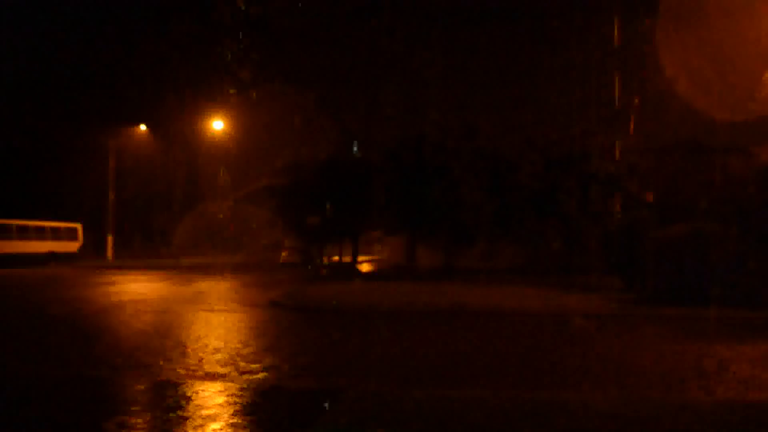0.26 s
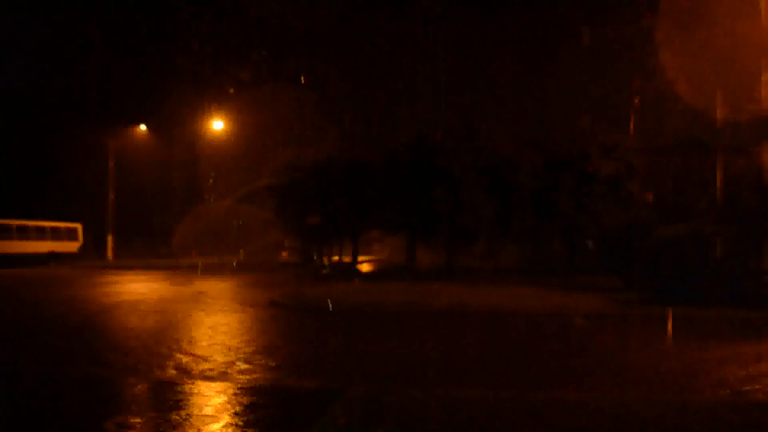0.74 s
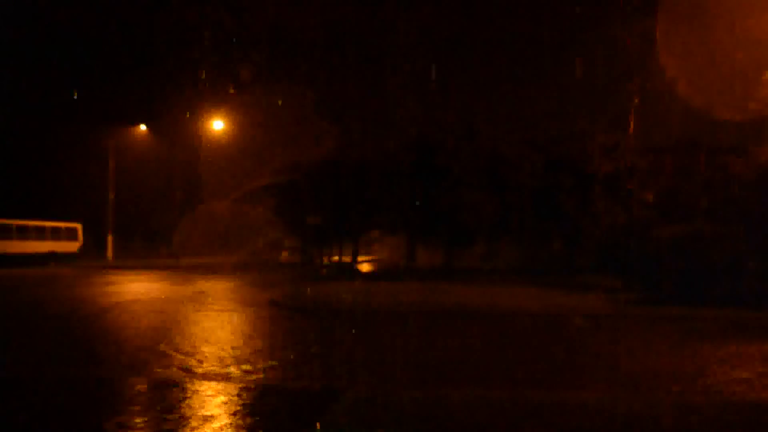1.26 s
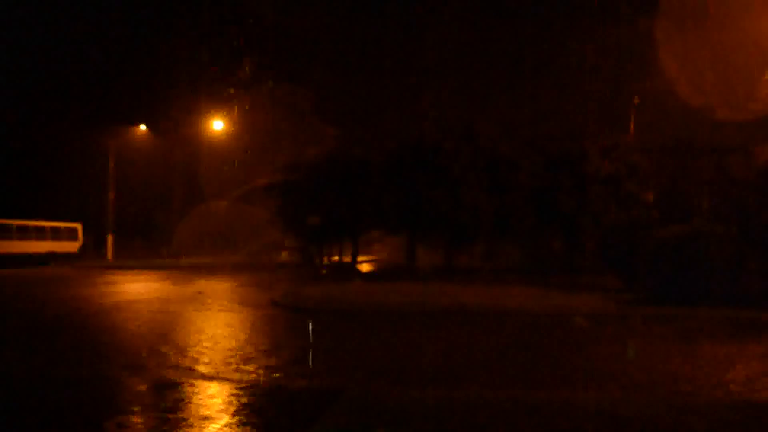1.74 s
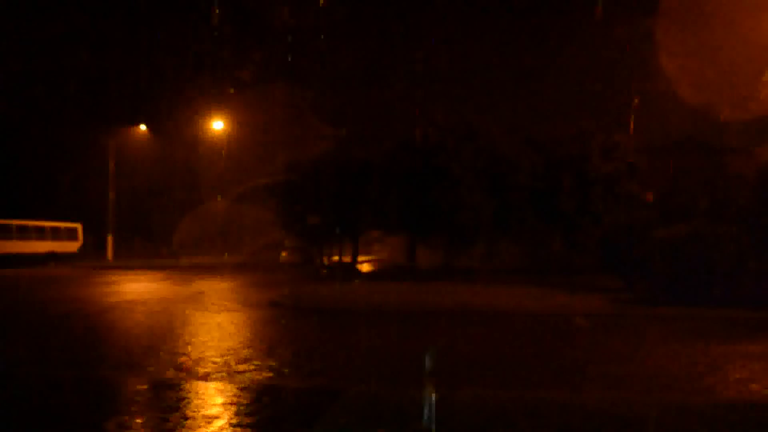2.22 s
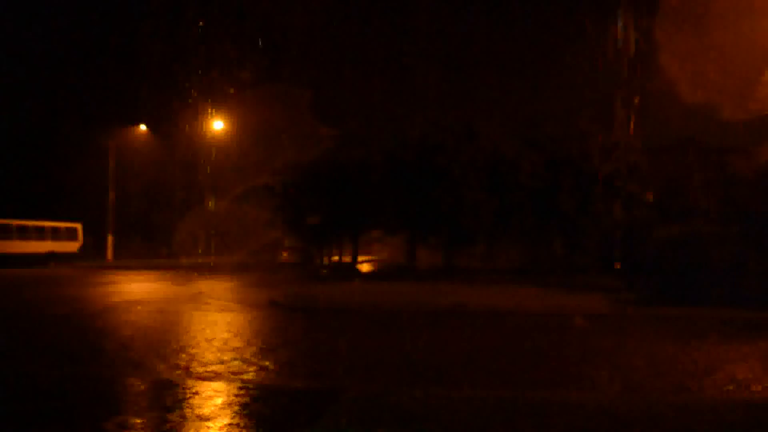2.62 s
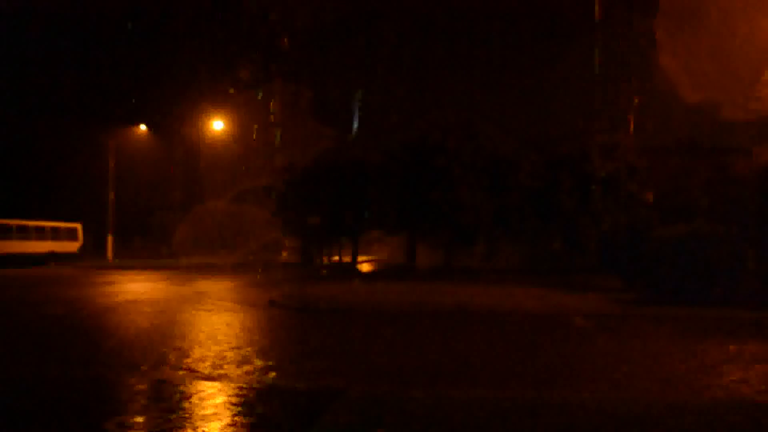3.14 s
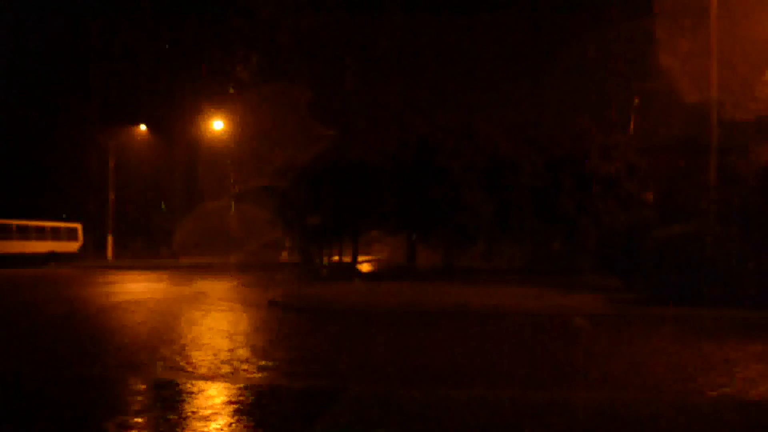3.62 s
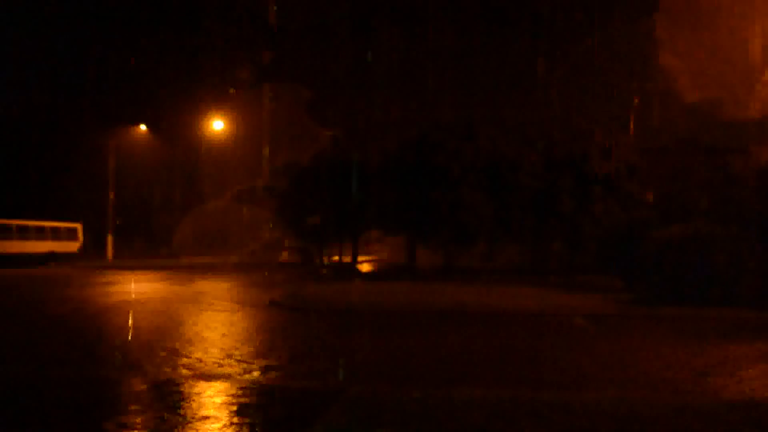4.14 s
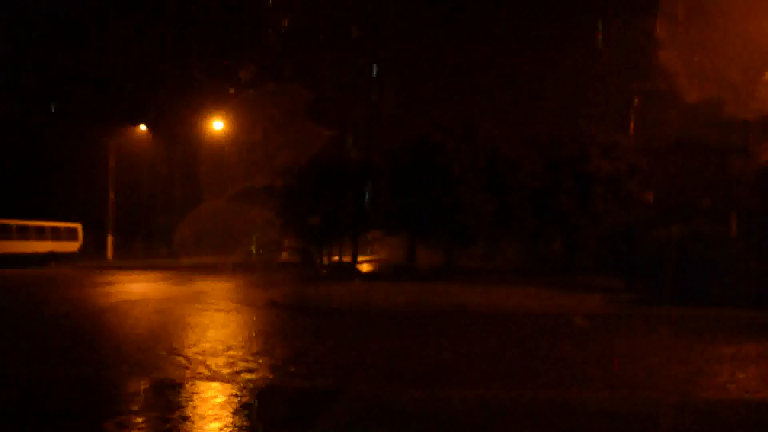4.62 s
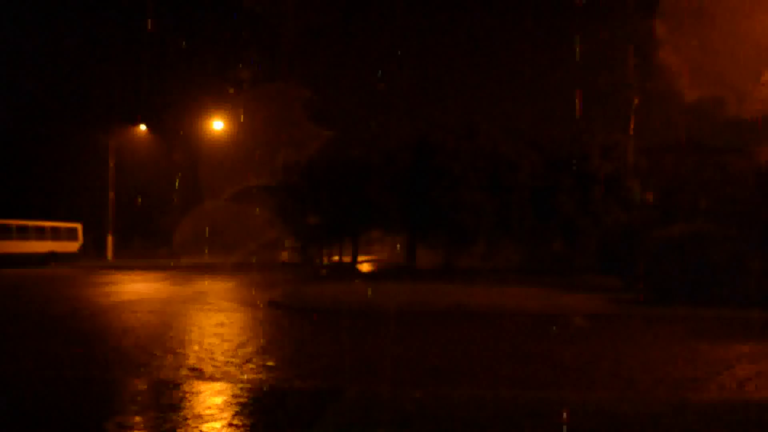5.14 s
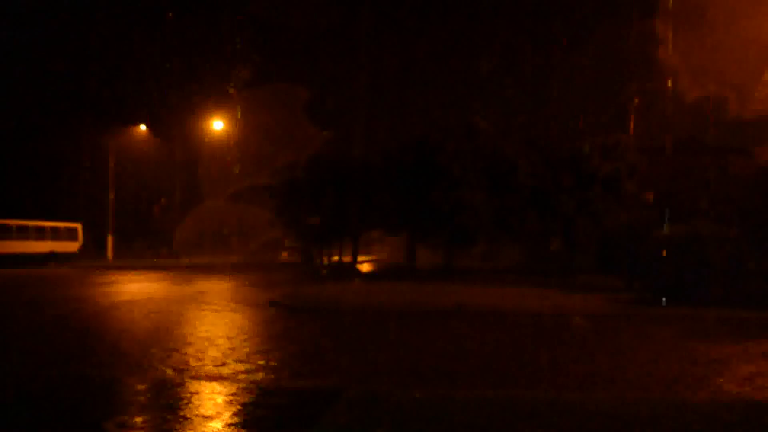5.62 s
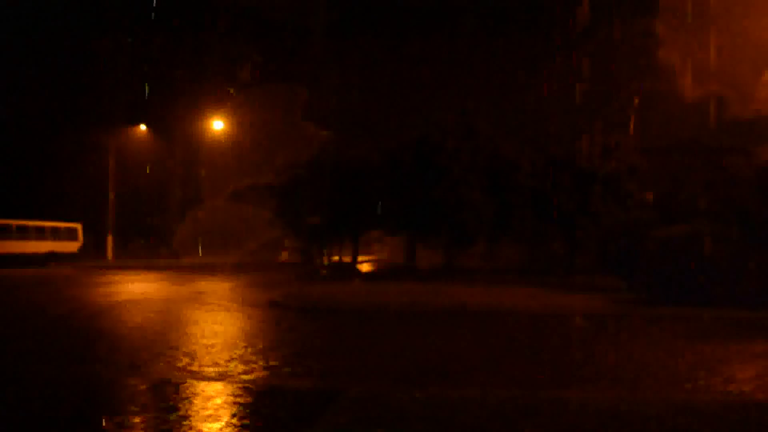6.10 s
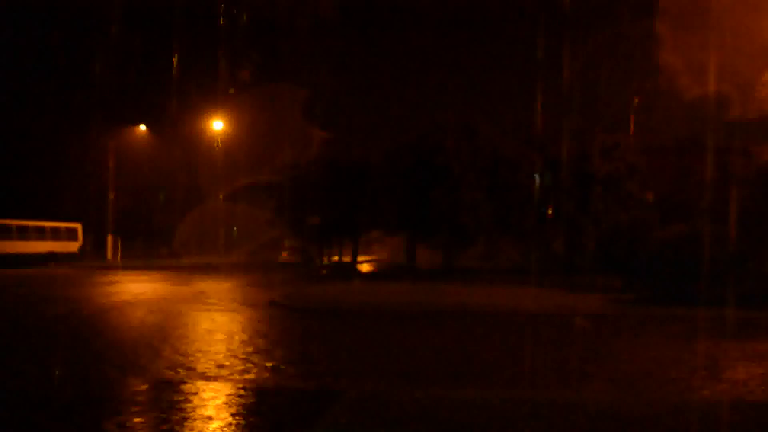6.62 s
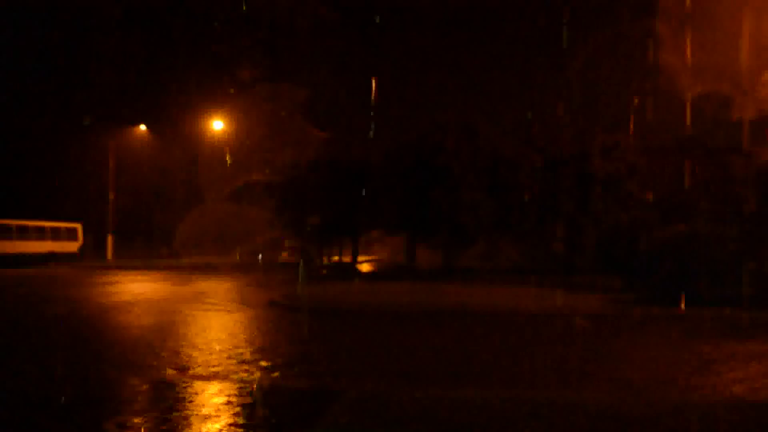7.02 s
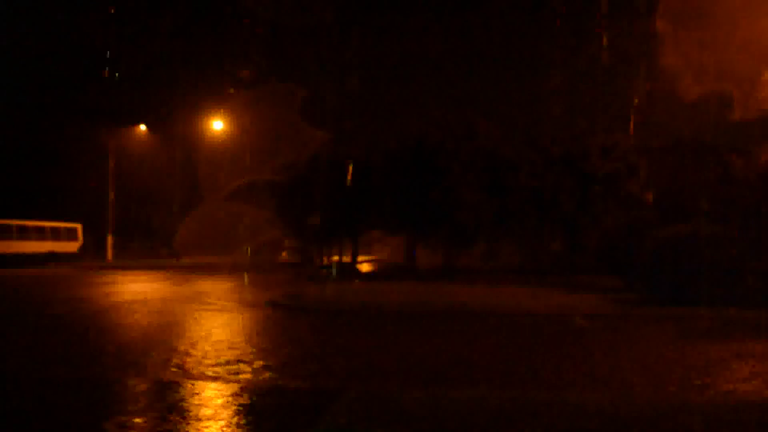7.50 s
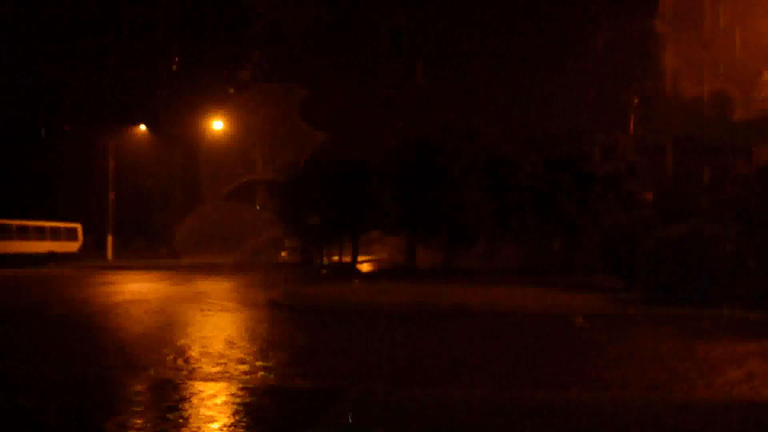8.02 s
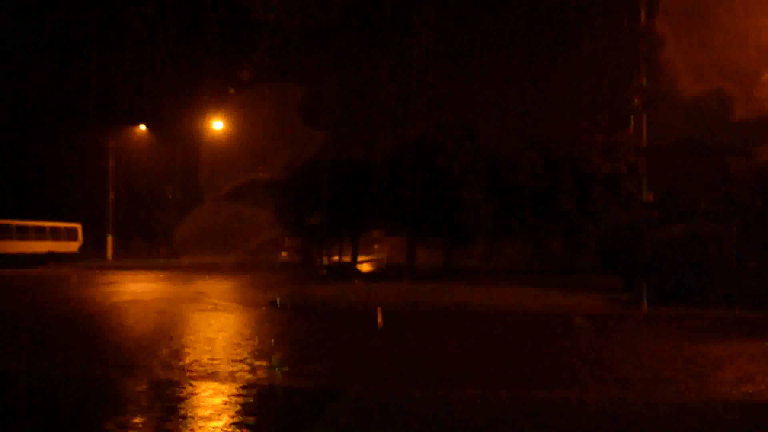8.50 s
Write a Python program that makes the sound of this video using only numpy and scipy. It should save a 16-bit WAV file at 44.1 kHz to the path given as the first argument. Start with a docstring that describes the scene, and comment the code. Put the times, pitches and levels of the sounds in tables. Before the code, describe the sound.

Even rain hiss and fine patter on puddled paving, with dense crisp nearby drips and faint dull microphone bumps late on.

```python
"""Rain hisses from afar and patters nearer by, on a paved street at night, heard from a sheltered doorway.
A far engine hums low in the first seconds. Close drops tick, trap a bubble, plop and throw a little spray.
The drops are filtered clicks, ringing sines and grainy noise; the doorway adds echoes, a tail and resonances.
Hiss, hum and draught are filtered noise. Late on, the hand bumps the microphone with dull thuds."""
import sys
import numpy as np
from scipy import signal
from scipy.fft import rfft, irfft
from scipy.io import wavfile

SR = 44100
rng = np.random.default_rng(int(sys.argv[2]) if len(sys.argv) > 2 else 0)


def waveform_to_disk(signal):
    """Save audio, clipped to [-1, 1], as 16-bit WAV at the path in sys.argv[1]."""
    frames = np.transpose(np.atleast_2d(signal))
    scaled = np.clip(frames, -1, 1) * 32767
    samples = np.round(scaled).astype(np.int16)
    wavfile.write(sys.argv[1], SR, samples)


N = 385875
TIME_S = np.arange(N) / SR


def from_db(db):
    """Decibels to amplitude gain."""
    return 10 ** (np.asarray(db) / 20)


def rms_one(x):
    """Scale to unit rms."""
    return x / np.sqrt(np.mean(x ** 2) + 1e-20)


def in_time(rows):
    """Two-column curve, interpolated at every sample."""
    return np.interp(TIME_S, *np.transpose(rows))


def band(x, low_hz, high_hz, order=2):
    """Causal Butterworth band-pass."""
    sos = signal.butter(order, [low_hz, high_hz], "band", fs=SR, output="sos")
    return signal.sosfilt(sos, x + 1e-18)


def noise_band(low_hz, high_hz, order=2):
    """Band-passed white noise, rms 1."""
    return rms_one(band(rng.standard_normal(N), low_hz, high_hz, order))


def colour(x, points):
    """Zero-phase filter from (frequency [Hz], gain [dB]) points, interpolated over log frequency."""
    hz, db = np.transpose(points)
    bins_hz = np.maximum(np.fft.rfftfreq(N, 1 / SR), 1)
    gain_db = np.interp(np.log(bins_hz), np.log(hz), db)
    return irfft(rfft(x) * from_db(gain_db), N)


def drift(knots_per_s):
    """Random curve: straight lines between normal knots of spread 1."""
    knots = rng.standard_normal(4000)
    return np.interp(TIME_S * knots_per_s, np.arange(len(knots)), knots)


def resonance(x, hz, width_hz):
    """Two-pole resonance, gain 1 at its peak."""
    radius = np.exp(-np.pi * width_hz / SR)
    zeros = np.array([1, 0, -1]) * (1 - radius ** 2) / 2
    poles = [1, -2 * radius * np.cos(2 * np.pi * hz / SR), radius ** 2]
    return signal.lfilter(zeros, poles, x + 1e-18)


def pulse(low_hz, high_hz, order=2, size=1500):
    """Short impact: band-passed unit impulse, peak 1."""
    shape = band(signal.unit_impulse(size), low_hz, high_hz, order)
    return shape / np.abs(shape).max()


def add(track, s, sound):
    """Mix a sound into the track at time s."""
    at = int(np.clip(round(s * SR), 0, N - 1))
    track[at:at + len(sound)] += sound[:N - at]


# far rain spectrum: (frequency [Hz], relative level [dB])
RAIN_SPECTRUM = [(40, -30), (120, -18.5), (270, -7), (550, -6.5), (740, -3), (950, -7), (1170, 1.5),
                 (1400, -8.5), (1900, -4.5), (2800, -2.5), (3700, -2), (5200, -5), (7500, -7.5),
                 (10000, -10)]
HISS_DB, FLICKER_SPREAD_DB = -34.5, 3


def far_rain():
    """Distant drops merge into an even hiss whose upper part flickers."""
    hiss = rms_one(colour(rng.standard_normal(N), RAIN_SPECTRUM))
    steady = colour(hiss, [(900, -4.5), (2200, -27)])
    flickering = (hiss - steady) * from_db(FLICKER_SPREAD_DB * drift(55))
    return from_db(HISS_DB) * (steady + flickering)


def impacts(per_s, spread_db):
    """Clicks of random sign at random moments, many small and few large."""
    sizes = from_db(spread_db * np.minimum(rng.exponential(1, N), 3))
    return sizes * rng.choice([-1, 1], N) * (rng.random(N) < per_s / SR)


PATTER_DB, BASE_DROPS_PER_S, FLURRY_SPREAD_DB = -39, 2400, 6.0


def patter():
    """Countless drops on street and puddles, in little flurries, each ringing for a few cycles."""
    pitches_hz = np.geomspace(1100, 10500, num=14)
    per_s = BASE_DROPS_PER_S / len(pitches_hz) * from_db(FLURRY_SPREAD_DB * drift(60))
    out = 0
    for hz in pitches_hz:
        out = out + resonance(impacts(per_s, spread_db=6.5), hz, width_hz=hz * 0.22)
    return from_db(PATTER_DB) * rms_one(out)


# far engine: (time [s], level [dB])
ENGINE_LEVEL = [(0, -60), (.5, -69), (2.2, -67.5), (3.2, -67), (3.8, -78)]


def far_engine():
    """A narrow band of low noise wavers like the hum of a far engine."""
    return from_db(in_time(ENGINE_LEVEL)) * noise_band(77.0, 100)


# air stirring at the microphone: (time [s], level [dB])
DRAUGHT_LEVEL = [(0, -63), (3.3, -65.5), (4.2, -73), (5.7, -72), (6.05, -56), (6.35, -67), (6.85, -55),
                 (7.1, -64), (7.24, -46), (7.65, -72), (8.35, -68), (8.65, -55)]


def draught():
    """Air stirring at the microphone makes low noise that swells and sinks."""
    return from_db(in_time(DRAUGHT_LEVEL)) * noise_band(38, 134)


NEAR_EDGE_TICK_DB = -26.0
REACH = 2.1  # far edge of the dripping ground, in near-edge distances
USUAL_TICK_HZ, TICK_LOG_SPREAD = 2820, 0.21


def scattered_drops(count=380):
    """Small drops all over the ground, as (s, Hz, dB); level falls as 1 / distance."""
    moment, spot = rng.random((count, 2)).T
    times_s = (np.arange(count) + 2 * moment) * N / SR / (count + 1)
    distance = np.sqrt(1 + (REACH ** 2 - 1) * spot)  # even over the area
    hz = USUAL_TICK_HZ * np.exp(TICK_LOG_SPREAD * rng.standard_normal(count))
    return np.column_stack([times_s, hz, NEAR_EDGE_TICK_DB - 20 * np.log10(distance)])


# individual light drops: (time [s], tick pitch [Hz], tick level before breakup [dB])
LIGHT_TICKS = [(0.1414, 2930, -18), (0.172, 3400, -21.5), (0.3279, 4200, -19.0), (0.3567, 2600, -23),
               (0.445, 2510.0, -24), (0.4668, 3580, -19), (0.631, 3700, -26.5), (0.732, 2400, -23.5),
               (0.792, 2300, -25), (0.8201, 3130, -19.5), (0.9608, 2350, -19.5), (1.1359, 3460.0, -24),
               (1.1809, 2560, -21), (1.2792, 2680, -19.5), (1.289, 2800, -17.5), (1.4198, 3150, -20),
               (1.4748, 2400, -21), (1.5843, 2640, -21), (1.7235, 2400, -21.5), (1.7995, 2850, -23),
               (1.8207, 2600, -16.5), (1.856, 2600, -24), (1.8993, 3730, -24.5), (1.9836, 3730, -16.5),
               (2.02, 2600, -25), (2.0901, 2680, -25), (2.1768, 3200, -17.5), (2.392, 3280, -23.5),
               (2.5125, 3500, -21), (2.5487, 3050, -23), (2.762, 2700, -24), (2.7875, 3500, -24.5),
               (2.8937, 3460.0, -24), (3.0336, 3440, -24), (3.0602, 2140.0, -22.5), (3.102, 3900, -22),
               (3.1845, 2730, -18.5), (3.4848, 2850, -24), (3.5283, 3020, -17.5), (3.556, 2800, -24.5),
               (3.7431, 3180, -21.5), (3.802, 2900, -25), (3.8731, 2600, -23.5), (3.9582, 2970, -21),
               (4.0108, 2580, -22.0), (4.0342, 3500, -21), (4.2092, 3050, -20), (4.2395, 3560, -18.5),
               (4.2554, 3030, -23), (4.3524, 2830, -21.5), (4.4145, 2980, -22.5), (4.5671, 2900, -20),
               (4.604, 3100, -28), (4.6232, 4250, -22), (4.6996, 3000, -18.5), (4.7627, 2700, -20),
               (5.1279, 2530, -20.5), (5.2156, 2300, -22), (5.3143, 2420.0, -22.5), (5.4373, 3330.0, -22),
               (5.493, 3000, -24), (5.542, 3000, -23), (5.6919, 2500, -18.5), (5.7835, 2830.0, -25),
               (6.0031, 2510.0, -24), (6.0654, 2270, -17), (6.161, 2980, -24.5), (6.2057, 2570, -18.5),
               (6.2208, 2480, -23), (6.344, 3400, -26), (6.4086, 2140.0, -24), (6.539, 2800, -24.5),
               (6.582, 2800, -24.5), (6.6671, 3900.0, -20), (6.8389, 3000, -24), (6.9919, 3480, -23),
               (7.0141, 2560, -21.5), (7.062, 2510.0, -22.5), (7.088, 3100, -25), (7.2219, 1980.0, -20),
               (7.331, 2600, -21), (7.3585, 2770, -19), (7.5295, 2980, -24), (7.5597, 2860, -23.5),
               (7.5906, 3200.0, -22), (7.6289, 3060, -17.5), (7.7332, 2460, -19.5), (7.7606, 3500, -23),
               (7.7715, 3100, -24), (7.94, 2770, -22.5), (8.1235, 2450, -22), (8.2763, 3550, -22),
               (8.3007, 2510.0, -22.5), (8.3609, 2740, -20), (8.4332, 2540, -21.5), (8.5241, 2600, -25),
               (8.6539, 3420, -17.5), (8.6722, 2580, -21.5)]
LIGHT_PLOP_DB, LIGHT_SPRAY_DB = -16.5, -8.5  # relative to the tick
USUAL_SPRAY_HZ, SPRAY_LOG_SPREAD = 5460, 0.53


def light_drops():
    """Light drops as drip rows: hardly a plop, and a little spray at a pitch of its own."""
    s, hz, db = np.vstack([LIGHT_TICKS, scattered_drops()]).T
    spray_hz = USUAL_SPRAY_HZ * np.exp(SPRAY_LOG_SPREAD * rng.standard_normal(len(s)))
    spray_hz = np.minimum(spray_hz, 10000)
    return np.column_stack([s, hz, db, db + LIGHT_PLOP_DB, spray_hz, db + LIGHT_SPRAY_DB])


def crackle(rise_s, decay_s, grain_db, size=1500):
    """Many tiny impacts: grainy noise of rms 1 under a rising, then dying envelope."""
    age_s = np.arange(size) / SR
    grains = rng.standard_normal(size) * from_db(grain_db * rng.standard_normal(size))
    return rms_one(grains) * (1 - np.exp(-age_s / rise_s)) * np.exp(-age_s / decay_s)


def spatter(hz):
    """A drop breaks up on the paving into a short, broad rattle of fragments; rms 1."""
    fragments = crackle(rise_s=0.0007, decay_s=0.0044, grain_db=6.5)
    return rms_one(band(fragments, hz / 1.47, hz * 1.47))


# faint drops break up more: (tick level [dB], amplitude share that stays one click [0-1])
SOLID_SHARE = [(-32.5, 0.76), (-18.5, .96)]
TICK_HALF_WIDTH, WIDTH_LOG_SPREAD = 0.23, 0.29  # half width in log pitch
SPATTER_DB = -18.5  # relative to the tick


def tick(hits, s, hz, db, blunt):
    """Impact on wet paving: a short click or a longer, more pitched blip, part of it lost to spatter."""
    width = np.exp(WIDTH_LOG_SPREAD * blunt)
    edges_hz = hz * np.exp(TICK_HALF_WIDTH * width * np.array([-1, 1]))
    solid = np.interp(db, *np.transpose(SOLID_SHARE))
    # the root of the width keeps the energy alike
    add(hits, s - .0002, -from_db(db) * solid * np.sqrt(width) * pulse(*edges_hz))
    add(hits, s, from_db(db + SPATTER_DB) * np.sqrt(1 - solid ** 2) * spatter(hz))


BUBBLE_DECAY_S, BUBBLE_RISE_PER_S = 0.0036, 14


def bubble(hz, size=1500):
    """A trapped air bubble rings, rising in pitch as it nears the surface, and dies away."""
    age_s = np.arange(size) / SR
    cycles = hz * age_s * (1 + BUBBLE_RISE_PER_S * age_s / 2)
    return np.sin(2 * np.pi * cycles) * np.exp(-age_s / BUBBLE_DECAY_S)


KNOCK_DB = -14  # relative to the plop


def plop():
    """A hollow plop in the film of water, with a dull knock on the paving under it."""
    return pulse(1017, 2000, order=3) - from_db(KNOCK_DB) * pulse(447, 940)


SPRAY_DECAY_S, SPRAY_DECAY_LOG_SPREAD = 0.0051, 0.21
SPRAY_RING_DB, SPRAY_RING_WIDTH_HZ = 7.0, 1640


def spray(hz, db, high):
    """Droplets thrown up fall back in a dying crackle that rings near a pitch of its own."""
    decay_s = SPRAY_DECAY_S * np.exp(SPRAY_DECAY_LOG_SPREAD * high)
    droplets = from_db(db) * crackle(rise_s=0.0017, decay_s=decay_s, grain_db=8.5)
    return droplets + from_db(SPRAY_RING_DB) * resonance(droplets, hz, SPRAY_RING_WIDTH_HZ)


# fat drips close to the doorway: (time [s], tick pitch [Hz], tick level before breakup [dB],
# plop level [dB], spray pitch [Hz], spray level before ringing [dB])
FAT_DRIPS = [(0.49, 2550, -17.5, -11.5, 4400.0, -26), (0.5106, 4450, -24, -11.5, 9000.0, -26),
             (0.558, 2800, -25, -24, 4400.0, -27), (0.7582, 2400, -24, -34, 4400.0, -25),
             (0.9438, 2230.0, -24, -22.5, 4400.0, -25.5), (1.1097, 3800, -19.5, -34, 6500.0, -25),
             (1.1668, 2200, -19.5, -29, 4400.0, -39), (1.3086, 2510.0, -18, -27, 4400.0, -30.5),
             (1.5558, 2300, -22, -27, 4400.0, -31), (1.9389, 2520, -21.5, -29, 7500.0, -30),
             (1.9517, 2460, -22, -26, 7500.0, -22), (2.0709, 2530, -20, -23.5, 4400.0, -42.0),
             (2.2941, 2720, -15, -25, 4000, -23), (2.521, 2090, -24, -28, 4000, -29),
             (2.7128, 2720.0, -10.5, -25.5, 4400.0, -36), (2.8285, 2950.0, -24, -32, 5700.0, -23),
             (2.9117, 1920, -15.5, -20.5, 5700.0, -26.5), (2.9607, 2720.0, -24, -36, 4400.0, -23),
             (3.2224, 2650, -19.5, -26, 5000.0, -20), (3.649, 4420, -18, -30, 8750, -27),
             (3.6661, 3100, -20.5, -27.5, 4400.0, -28), (3.7167, 3750.0, -21, -25, 6500.0, -28),
             (3.9077, 3460.0, -20, -24, 9000.0, -26), (4.0653, 2620.0, -29, -31, 5000.0, -23),
             (4.0858, 2400, -23, -21, 7500.0, -28), (4.1349, 2470, -23, -25.5, 5700.0, -33),
             (4.1681, 2430, -20.5, -25.0, 4400.0, -24), (4.2975, 2860, -21, -28, 4400.0, -19),
             (4.9041, 2230.0, -28, -28, 4400.0, -22), (4.9638, 2540, -16, -18.5, 4400.0, -42.0),
             (5.0007, 2950.0, -21, -31.5, 4970, -23.5), (5.0768, 1850, -16, -21, 5760, -20),
             (5.2503, 3100, -17, -28, 5000.0, -23), (5.2647, 3200.0, -24, -34, 5000.0, -23.5),
             (5.6326, 2450, -20.5, -24, 4400.0, -34), (5.9155, 2300, -29, -36, 4430, -23),
             (5.9806, 1970, -19.5, -25, 4400.0, -27.5), (6.107, 1900.0, -42, -42.0, 6500.0, -23.5),
             (6.4406, 2700, -14, -28, 4400.0, -17.5), (6.6493, 2420.0, -25, -30, 4400.0, -26.5),
             (6.6993, 2600, -19.5, -27.5, 4400.0, -22), (6.8233, 2400, -20, -11.5, 4400.0, -31),
             (6.8673, 3360, -17, -15.5, 8700, -18.5), (6.8984, 1980.0, -37, -30, 5700.0, -25.5),
             (6.9211, 1970, -17.5, -22, 5700.0, -29), (7.2546, 2530, -21.5, -25.5, 4400.0, -27),
             (7.4477, 2420.0, -25.5, -26, 5700.0, -24.5), (7.8159, 2500, -15.5, -21.5, 4400.0, -27),
             (8.0456, 2510.0, -18.5, -24.5, 7500.0, -27.5), (8.1856, 4060.0, -20, -23, 6500.0, -29),
             (8.2057, 3550, -16.5, -31, 7500.0, -25.5), (8.5016, 2510.0, -21.5, -28, 5700.0, -25.5)]
BUBBLE_DB, BUBBLE_SPREAD_DB = -19.5, 3  # relative to the tick
CRACK_DB, CRACK_SPREAD_DB = 8.5, 2.5  # bursting film, relative to the spray


def drips():
    """Every fat or light drop ticks, traps a bubble, plops, bursts the water film and throws spray."""
    rows = np.vstack([FAT_DRIPS, light_drops()])
    hits, bright = np.zeros(N), np.zeros(N)
    plop_sound = plop()
    chance = np.clip(rng.standard_normal((len(rows), 4)), -1.5, 1.5)
    for row, (blunt, trapped, hard, high) in zip(rows, chance):
        s, tick_hz, tick_db, plop_db, spray_hz, spray_db = row
        tick(hits, s, tick_hz, tick_db, blunt)
        bubble_db = tick_db + BUBBLE_DB + BUBBLE_SPREAD_DB * trapped
        add(hits, s + .0006, from_db(bubble_db) * bubble(tick_hz))
        add(hits, s - .0005, -from_db(plop_db) * plop_sound)
        crack_db = spray_db + CRACK_DB + CRACK_SPREAD_DB * hard
        add(hits, s, -from_db(crack_db) * pulse(spray_hz / 1.43, spray_hz * 1.57))
        add(bright, s, spray(spray_hz, spray_db, high))
    return hits + band(bright, 3300, 19845)


def scatter(x, tail_db, decay_s):
    """Rough walls smear the drops into a short tail: noise bands follow their decaying power."""
    edges_hz = np.geomspace(900, 14000, num=11)
    keep = np.exp(-1 / (SR * decay_s))
    out = 0
    for low_hz, high_hz in zip(edges_hz, edges_hz[1:]):
        power = signal.lfilter([1 - keep], [1, -keep], band(x, low_hz, high_hz, order=3) ** 2)
        out = out + np.sqrt(power) * noise_band(low_hz, high_hz, order=3)
    return from_db(tail_db) * out


# doorway reflections: (mean delay [s], low edge [Hz], high edge [Hz], gain [dB])
REFLECTIONS = [(0.001698, 3760, 5500, -4), (.00505, 2210, 3420, 8), (.00745, 2360, 3970, 0.5),
               (.00555, 350, 9600, -7.5), (0.0065, 200, 11000, -11.5)]
# resonances of the recess: (frequency [Hz], width [Hz], gain [dB])
RECESS_MODES = [(1063, 26, 0), (1182, 38, 7), (1400, 27, -8), (2186, 92, -4), (2670, 150, -8.5),
                (3006, 140, -9.5), (3350, 49, -12), (4244, 67, 4.5)]
PATH_SPREAD_S = .0001  # delays differ from one landing spot to the next


def doorway(x):
    """Three narrow reflections and two fainter broad ones, then a scattered tail and the recess's resonances."""
    out = x.copy()
    for delay_s, low_hz, high_hz, db in REFLECTIONS:
        heard_at_s = TIME_S - delay_s - PATH_SPREAD_S * drift(12)
        out += from_db(db) * np.interp(heard_at_s, TIME_S, band(x, low_hz, high_hz))
    add(out, .001, scatter(out, tail_db=-10, decay_s=0.0066))
    ringing = sum(from_db(db) * resonance(out, hz, width_hz) for hz, width_hz, db in RECESS_MODES)
    return out + ringing


# bumps on the microphone's case: (time [s], peak level [dB])
CASE_BUMPS = [(6.045, -31), (6.996, -37), (7.191, -32), (7.236, -31), (7.290, -28.5)]


def hand_bumps():
    """The hand bumps the microphone's case: dull low impacts."""
    out = np.zeros(N)
    for s, db in CASE_BUMPS:
        add(out, s, from_db(db) * pulse(50, 235))
    return out


def scene():
    """Drops sound through the doorway, over rain, engine, draught and bumps."""
    rain = far_rain() + patter()
    low = far_engine() + draught() + hand_bumps()
    return (rain + low + doorway(drips()))[None, :]


# microphone response: (frequency [Hz], gain [dB])
MIC_RESPONSE = [(7000, 0.5), (7900, -3), (8600, 3.5), (9800, 2), (10700, -7.5), (11500, -19), (12100, -59),
                (12900, -15), (14600, -26.5)]
CUTOFF_HZ = 15300


def record(dry):
    """A small microphone with a dull top, then a steep low-pass."""
    heard = colour(dry[0], MIC_RESPONSE)
    low_pass = signal.ellip(10, .2, 80, CUTOFF_HZ, fs=SR, output="sos")
    return signal.sosfilt(low_pass, heard)[None, :]


dry = scene()
out = record(dry)
waveform_to_disk(out)
```